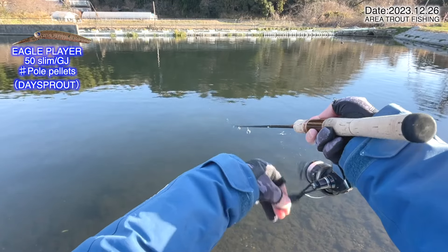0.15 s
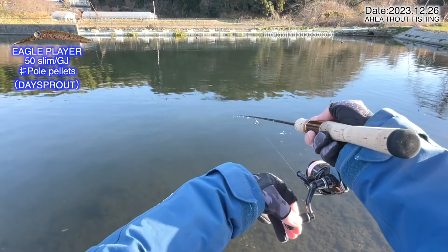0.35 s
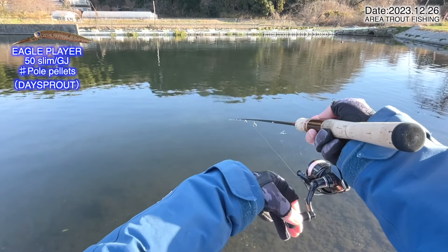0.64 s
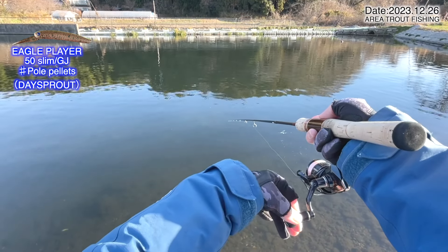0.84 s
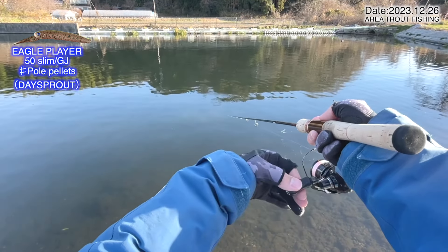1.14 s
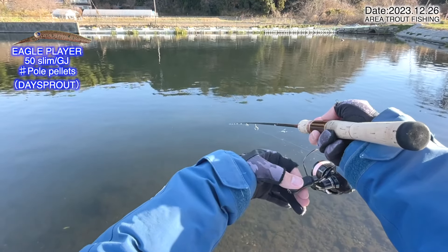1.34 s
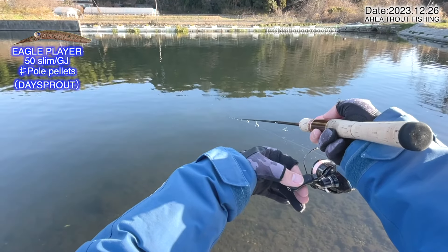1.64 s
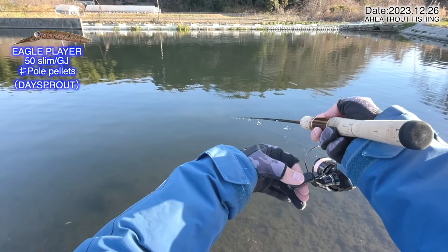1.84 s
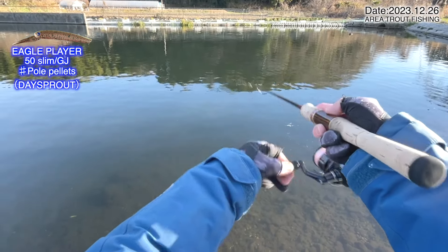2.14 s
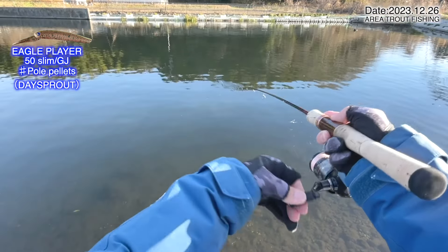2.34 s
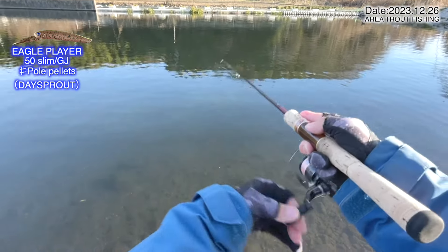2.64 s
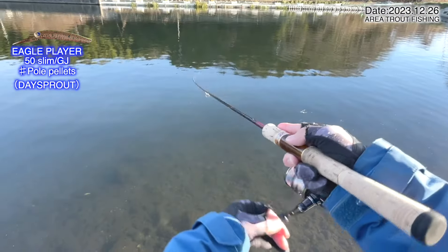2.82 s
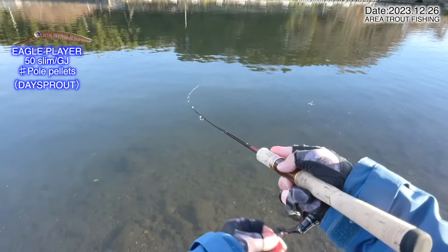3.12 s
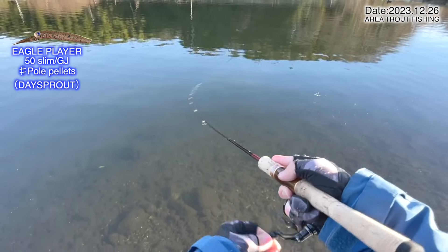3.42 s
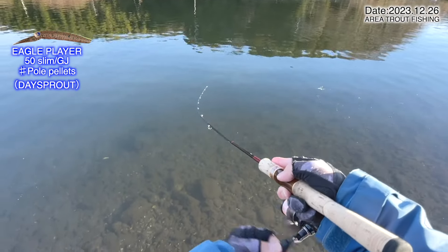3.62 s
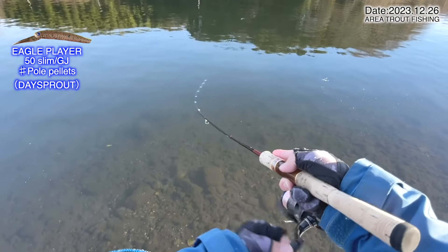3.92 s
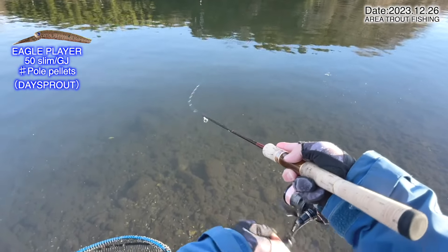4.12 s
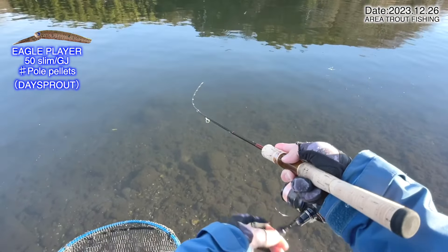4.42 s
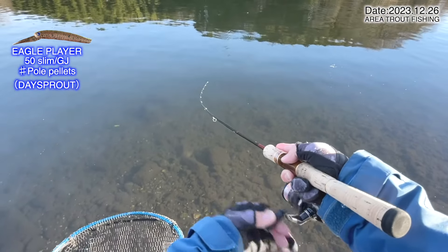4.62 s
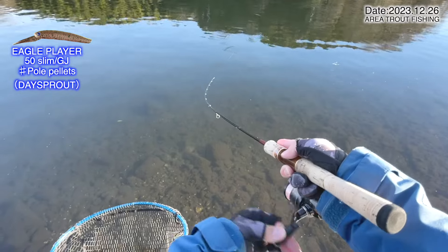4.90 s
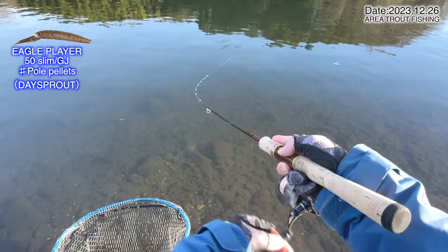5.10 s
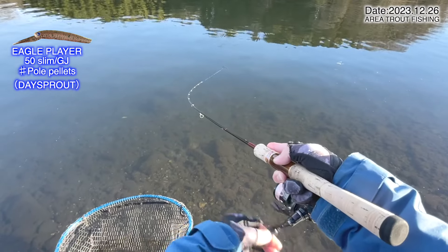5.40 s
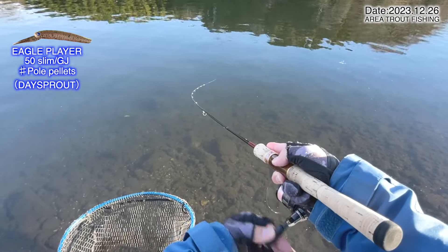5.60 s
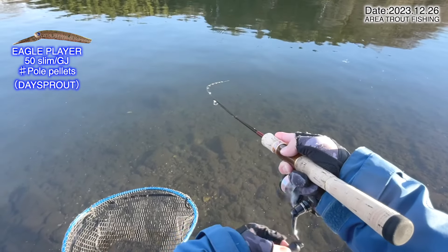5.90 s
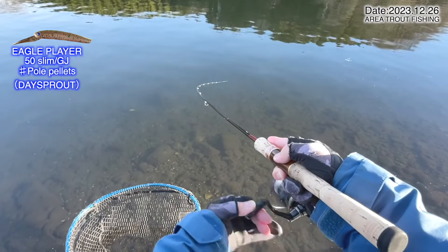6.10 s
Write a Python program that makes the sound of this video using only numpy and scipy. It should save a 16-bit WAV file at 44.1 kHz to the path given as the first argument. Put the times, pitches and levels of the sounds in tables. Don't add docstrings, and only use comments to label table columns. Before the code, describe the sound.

A spinning reel held near a two-channel microphone outdoors. Light clicks and cloth brushes come first over low air wash and a far pump hum. A rattle of ticks and a sharp bail clack lead into a rapid, crisp ratchet buzz that pulses several times a second. It thins to slow single clicks, then buzzes briefly again near the end, with a thin hiss of running line throughout the pull.

```python
import sys
import numpy as np
from scipy import signal
from scipy.fft import rfft, irfft, next_fast_len
from scipy.io import wavfile
from scipy.ndimage import uniform_filter1d, minimum_filter1d

SR = 44100
rng = np.random.default_rng(int(sys.argv[2]) if len(sys.argv) > 2 else 0)


def bounce(signal):
    frames = np.transpose(np.atleast_2d(signal))
    limited = np.clip(frames, -1, 1)
    pcm = np.round(limited * 32767).astype(np.int16)
    wavfile.write(sys.argv[1], SR, pcm)


def convert_level_to_amplitude(level_db):
    exponent = np.asarray(level_db, float) / 20
    return 10 ** exponent


N = 275659
TEETH = 24

# slack moment in seconds, speed then in teeth per second,
# moment of full pull in seconds, speed then in teeth per second.
FIGHT = [(2.4065, 150, 2.445, 370), (2.4876, 235, 2.56, 450), (2.6291, 180, 2.69, 330),
         (2.7555, 86, 2.835, 410), (2.8991, 180, 2.965, 320), (3.0275, 185, 3.08, 345),
         (3.1512, 105, 3.23, 390), (3.3017, 98, 3.365, 430), (3.4397, 67, 3.505, 320),
         (3.5782, 115, 3.63, 320), (3.7044, 117, 3.81, 410), (3.891, 115, 3.96, 265),
         (4.012, 145, 4.075, 340), (4.1355, 110, 4.19, 300), (4.2856, 100, 4.335, 320),
         (4.4041, 125, 4.48, 300), (4.5687, 112, 4.615, 215)]
BOLT = [
    (5.7017, 78, 5.756, 215),
]
RALLY = [
    (5.8291, 93, 5.857, 184),
    (5.892, 142, 5.945, 235),
]
LAST = [
    (6.1695, 120, 6.215, 238),
]
# time in seconds, speed in teeth per second.
STOPS = [
    (4.6464, 95),
    (5.8007, 110),
    (5.984, 120),
    (6.27, 210),
]
# frequency in Hz, likeness from -1 to 1.
AIR_SAME = [(60, 0.9), (200, 0.97), (350, 0.94), (700, 0.3), (1400, 0.55), (3800, -0.16), (4450, 0.3),
            (5300, -0.088), (6500, -0.073), (6950, -.98), (7950, -.98), (8400, 0.6)]


def evened(x):
    return x / np.sqrt(np.mean(x ** 2) + 1e-20)


def read(points, hz):
    f, value = np.transpose(points)
    return np.interp(np.log(hz + 1), np.log(f + 1), value)


def drifting(count, columns):
    alike = 3
    return np.sqrt(alike) * uniform_filter1d(rng.standard_normal((count, columns)), size=alike, axis=0)


def run_of_line(tugs, stop):
    tugs = np.array(tugs)
    s, speed = np.vstack([tugs.reshape(-1, 2), stop]).T
    t = np.arange(s[0], s[-1], 1 / SR)
    place = np.interp(t, s, np.arange(len(s)))
    eased = np.floor(place) + .5 - .5 * np.cos(np.pi * (place % 1))
    rate = np.interp(eased, np.arange(len(s)), speed)
    teeth = np.cumsum(rate) / SR
    slack = np.interp(s[::2], t, teeth)
    whole = np.cumsum(np.round(np.diff(slack, prepend=slack[0])))
    at = np.interp(np.arange(whole[-1] + 1), np.interp(teeth, slack, whole), t)
    return np.array([at, np.interp(at, t, rate)])


def cup_energy(s):
    # time in seconds, tick energy in dB.
    passes = [(2.232, -25.5), (2.423, -22), (2.509, -20.5), (2.566, -23), (2.646, -19.5), (2.719, -14.5),
              (2.826, -22), (2.921, -19.5), (2.994, -18.5), (3.088, -15.5), (3.199, -20), (3.268, -17.5),
              (3.361, -18), (3.484, -19), (3.582, -23), (3.661, -19), (3.783, -16.5), (3.847, -18),
              (3.97, -19), (4.067, -14.5), (4.167, -20.5), (4.259, -20), (4.363, -20), (4.486, -19),
              (4.616, -23), (4.943, -21.5), (5.327, -26), (5.742, -16), (5.921, -20), (6.09, -13)]
    # share of a turn, level of the cup in dB.
    around = [(0, -1), (.12, -10.5), (.28, -14.5), (.55, -11), (.8, -16), (.9, -3.5), (1, -1.5)]
    turn_s, turn_db = np.transpose(passes)
    marks = np.interp(turn_s, s, np.arange(len(s)))
    marks = np.concatenate([[marks[0] - TEETH], marks, [marks[-1] + TEETH, marks[-1] + 2 * TEETH]])
    angle = np.interp(np.arange(len(s)), marks, np.arange(len(marks)))
    return np.interp(s, turn_s, turn_db) + np.interp(angle % 1, *np.transpose(around))


def ring(s, energy_db, modes, tooth, spread_db, detune, rise_s):
    t, out = np.arange(560) / SR, np.zeros(N + 560)
    sound = np.zeros((len(s), len(t)))
    for hz, db, t60 in modes:
        chance = drifting(len(s), columns=3)
        of_tooth = rng.standard_normal(TEETH)[tooth]
        tuned = hz * (1 + detune * (of_tooth * .5 + 1.03 * chance[:, 0]))
        wave = np.sin(2 * np.pi * tuned[:, None] * t + 2 * chance[:, 1:2])
        sound += convert_level_to_amplitude(db + spread_db * chance[:, 2:]) * convert_level_to_amplitude(-60 * t / t60) * wave
    sound *= 1 - np.exp(-(t / rise_s) ** 2)
    sound *= (convert_level_to_amplitude(energy_db) / np.linalg.norm(sound, axis=1))[:, None]
    np.add.at(out, np.round(s * SR).astype(int)[:, None] + np.arange(len(t)), sound)
    return out[:N]


def drag():
    # frequency in Hz, level in dB, t60 in seconds.
    parts = [
        [(5000, -2, 0.007), (5350, 0, 0.009), (5700, -5, 0.006), (4650, -13, 0.005), (6250, -7, .005),
         (6800, -10, .005), (7200, -13, 0.005)],
        [(9200, 0, .008), (8350, -7, .008), (9750, -10, .006), (7600, -12, .004)],
        [(10700, -12, 0.008), (11480, -5, 0.01), (12500, 4, 0.009), (13200, 6, .008), (13750, 9, 0.007),
         (14400, 8, 0.007), (15100, 8, 0.007), (15600, 2, 0.006)],
        [(3044, -4, 0.04), (3505, -5, 0.1), (2000, 0.5, 0.008), (1500, 0.5, 0.0043), (2360, 6, 0.0051),
         (3960, 2, 0.006), (4300, 2, .006)],
    ]
    rise_s = [0.00039, 0.000046, 0.0003, 0.00044]
    detune = [.016, .013, .019, .005]
    # lower ring in dB, upper ring in dB.
    bite = [(-1.5, -7.5), (-8, -0.5), (-4, -2.5), (-4.5, -1), (-4, -1), (-3.5, -6), (-4, -0.5), (-3, -4),
            (-3.5, -4.5), (-6.5, -2.5), (-2, -2), (-5, -5), (-3, 0), (-2.5, -2.5), (-3, -3), (-3, -4.5),
            (-4, -3), (0, -5), (-3.5, -3), (-4, -2.5), (-3.5, -2)]
    # tick energy in dB at 200 teeth per second, dB more for ten times the speed.
    blow = [
        (-22, 1),
        (-21.5, 6),
        (-38, 5),
    ]
    uneven_db = [1.67, 2.47, 1.47, 0.92]
    # time in seconds, cup in dB, lower ring in dB, upper ring in dB.
    strike = [(2.1654, -38, -29.6, -31), (2.1842, -35, -30.2, -27), (2.1972, -40, -32, -27),
              (2.2065, -34, -34, -30.5), (2.2138, -38, -31, -28), (2.22, -24, -23, -22),
              (2.2251, -29, -30.0, -28), (2.23, -28, -28, -19), (2.2348, -29, -16, -20),
              (2.2398, -27, -24, -32), (2.245, -31, -31.6, -30.5), (2.2499, -33, -26, -32.3),
              (2.2556, -40, -29, -27), (2.2614, -37, -27, -27), (2.267, -41, -34, -23),
              (2.2726, -37, -29, -28), (2.2785, -35.9, -36, -28), (2.2834, -40, -31.6, -25),
              (2.2887, -32, -28, -14), (2.2944, -32, -28, -29), (2.3003, -33, -26, -24),
              (2.3069, -32, -28, -27), (2.3141, -35, -27, -32.8), (2.323, -39, -30, -30.1),
              (2.3351, -30, -26, -31), (2.3533, -35, -25.5, -25), (2.3743, -38, -30, -30.5),
              (2.3893, -35.4, -28.9, -26.7), (2.3992, -36, -33, -33.1)]
    tiring = [(4.6593, -29, -23, -20), (4.6717, -26.5, -35.5, -28.0), (4.685, -25, -26, -19),
              (4.7016, -27, -28, -18), (4.717, -27, -27, -17), (4.7346, -32, -38.0, -28),
              (4.7565, -38, -30, -26), (4.7746, -38, -26, -26), (4.7918, -31.5, -31, -25),
              (4.8095, -38, -26, -25), (4.8296, -40, -29, -27), (4.8482, -38, -25, -25.0),
              (4.8645, -39, -26, -27), (4.8772, -30, -23.0, -25), (4.8885, -32.0, -20, -30),
              (4.9001, -32.5, -29.5, -28), (4.9107, -28, -27, -32.5), (4.921, -24, -28, -31),
              (4.9317, -27, -29, -29), (4.9427, -20, -19, -30), (4.9548, -30.0, -21, -34),
              (4.9672, -26, -31.5, -32), (4.9769, -32, -22, -28.0), (4.9855, -31.0, -31, -24),
              (4.9946, -37, -39.5, -32.5), (5.0034, -26.5, -30, -30.5), (5.0135, -28, -24, -28.5),
              (5.0235, -27, -26, -28), (5.0331, -32.0, -24, -28.5), (5.0422, -31.5, -28.5, -22),
              (5.0523, -33, -26, -28), (5.0634, -34, -22, -26), (5.073, -36, -25, -18),
              (5.0836, -37.0, -24, -31), (5.094, -35, -30.5, -26.0), (5.1056, -36.0, -26, -20),
              (5.1196, -37, -30, -24.0), (5.1364, -35, -36, -23)]
    creep = [(5.1559, -37, -33, -26), (5.1758, -34, -29, -28), (5.2012, -30, -28, -30),
             (5.2318, -29, -30, -25), (5.266, -27, -31, -29.5), (5.296, -25.5, -28, -34),
             (5.3279, -24.5, -25, -27), (5.3588, -26.5, -24, -19), (5.3811, -26, -27, -26),
             (5.4047, -29, -24, -25), (5.4275, -28, -25, -20), (5.447, -26, -26, -32),
             (5.4676, -30, -22.5, -21.5), (5.4946, -32, -24.5, -24), (5.5297, -29.5, -30, -28),
             (5.558, -28, -28, -31), (5.582, -35, -31, -26), (5.611, -30, -24, -28),
             (5.6344, -36, -28, -23), (5.6526, -33, -28, -35), (5.6683, -34, -29, -26),
             (5.6844, -35, -23, -24)]
    pause = [(5.8168, -42, -39, -35), (5.9896, -31, -24, -22.0), (5.9988, -37, -34, -20),
             (6.0123, -33, -33.5, -28), (6.027, -34, -30, -23), (6.0404, -33, -32, -25.5),
             (6.0546, -32.0, -36.5, -28.0), (6.0674, -28, -32.5, -27), (6.078, -24.5, -26, -30),
             (6.0883, -19, -31.5, -28.5), (6.0986, -17.5, -27, -26), (6.1085, -26, -24, -23),
             (6.1185, -26, -23, -32.5), (6.129, -29, -23, -33.5), (6.139, -27, -24.5, -21),
             (6.15, -28, -22, -28), (6.161, -32, -30.0, -38)]
    body_share, single_body_db, uneven_slow_db = 0.1, -39, 2

    tugs = [FIGHT, BOLT, RALLY, LAST]
    run_s, rate = np.concatenate([run_of_line(*run) for run in zip(tugs, STOPS)], axis=1)
    pull_s = np.concatenate(tugs)[:, 2]
    lower_db, upper_db = (np.interp(run_s, pull_s, db) for db in np.transpose(bite))
    single_s, *single_db = np.concatenate([strike, tiring, creep, pause]).T
    s = np.concatenate([run_s, single_s])
    order = np.argsort(np.argsort(s))
    cup_db = cup_energy(np.sort(s))[order][:len(run_s)]

    run_db = [cup_db]
    for (db, more_db), bite_db in zip(blow, [lower_db, upper_db, upper_db]):
        run_db.append(db + bite_db + more_db * np.log10(rate / 200))
    run_db = np.array(run_db)
    run_db[3] += body_share * (cup_db + 29.0)
    chance = rng.standard_normal((len(run_s), 5)).T
    run_db += np.reshape(uneven_db, (4, 1)) * drifting(len(run_s), columns=4).T
    run_db += uneven_slow_db * np.clip(1.5 - rate / 100, 0, 1) * chance[1:]

    late_s = np.append(.00008 * chance[0], 0 * single_s)
    s = np.clip(s + late_s, 0, N / SR)
    single_db = single_db + [0 * single_s + single_body_db]
    energy_db = np.concatenate([run_db, single_db], axis=1)
    energy_db[:, s >= N / SR] = -200
    return sum(ring(s, e, modes, order % TEETH, 5.9, share, rise)
               for e, modes, share, rise in zip(energy_db, parts, detune, rise_s))


def knocks(table, t60):
    out, t = np.zeros(N), np.arange(300) / SR
    for s, db, hz, width_hz in table:
        puff = (rng.standard_normal(len(t)) + 3 * (t == 0)) * convert_level_to_amplitude(-60 * t / t60)
        b, a = signal.iirpeak(hz, hz / width_hz, SR)
        snap = signal.lfilter(b, a, signal.lfilter(b, a, puff))
        out[round(s * SR):][:len(t)] += convert_level_to_amplitude(db) * snap / abs(snap).max()
    return out


def handling():
    # time in seconds, peak in dB, centre in Hz, width in Hz.
    handle_bail = [(0.091, -49.5, 4500, 4000), (0.0912, -57, 12800, 3000), (0.211, -49, 3870, 1200),
                   (0.2106, -53, 1800, 1500), (1.034, -51.5, 1800, 1500), (0.2112, -43, 7200, 6000),
                   (1.0343, -46.5, 3700, 1500), (1.0345, -42.5, 7510, 6000), (1.103, -55, 8000, 8000),
                   (1.109, -61, 8050, 7980), (1.198, -45.5, 706, 600), (2.1056, -43, 6000, 5040),
                   (0.2108, -48, 13000, 3000), (0.9, -69, 12500, 3000), (2.625, -46.5, 900.3, 911),
                   (4.24, -45.5, 811, 900)]
    hard_drops = [
        (2.4998, -25, 11500, 9000),
        (2.5040, -30, 12500, 5000),
        (3.4598, -32, 6000, 7000),
        (5.7418, -30, 5300, 1800),
        (3.5782, -30, 5400, 1400),
        (3.5864, -31, 5400, 1400),
    ]
    return knocks(handle_bail + hard_drops, t60=0.0067)


def bail_clack():
    # time in seconds, peak in dB, centre in Hz, width in Hz.
    slap = [
        (2.4031, -28, 2500, 2600),
        (2.4040, -43, 1320, 920),
        (2.4035, -30, 3900, 3000),
    ]
    clack = knocks(slap, t60=0.0035)
    return np.array([clack, np.roll(clack, 3)])


def ports(x):
    # frequency in Hz, lead in radians.
    lead = [(0, 0), (2000, .3), (2700, 3.1), (3600, 1.5), (5700, .9), (6700, 2.8), (7600, 3.2), (9300, 4.4),
            (10400, 6.2), (11600, 6.4), (13900, 9.3), (14600, 9.5), (15400, 10.2), (16000, 10.6)]
    # frequency in Hz, left over right in dB.
    balance = [(1300, 1.5), (2400, 2.5), (4400, -2), (6500, -2), (8000, 0), (9500, -1), (15000, 0)]
    size = next_fast_len(N)
    hz = np.fft.rfftfreq(size, 1 / SR)
    half = convert_level_to_amplitude(read(balance, hz) / 2) * np.exp(.5j * np.interp(hz, *np.transpose(lead)))
    return irfft(rfft(x, size) * np.array([half, 1 / half]), size)[:, :N]


def near_echo(x):
    count = 900
    fade = convert_level_to_amplitude(-60 * np.arange(count) / SR / .012)
    echo = uniform_filter1d(rng.standard_normal((2, count)), size=2) * fade
    wet = signal.fftconvolve(x[None], echo / np.linalg.norm(echo[0]), axes=1)[:, :N]
    return convert_level_to_amplitude(-10) * wet


def groan():
    # start in seconds, length in seconds, pitch in Hz, peak in dB.
    s, length, hz, db = (3.29, .11, 388, -51)
    u = np.clip((np.arange(N) / SR - s) / length, 0, 1)
    turn = 2 * np.pi * np.cumsum(hz * (1 - 0.053 * u ** 2)) / SR
    return convert_level_to_amplitude(db) * np.sin(np.pi * u) ** 2 * np.sin(turn)


def noise(colour, patchy_db, likeness):
    # frequency in Hz, left over right in dB.
    balance = [(60, -1), (200, -3), (380, -3.5), (700, .5), (1300, 0), (2400, 4), (4400, -1), (8000, 0)]
    hz = np.fft.rfftfreq(1024, 1 / SR)
    a, b, c, d, patches = rng.standard_normal((N // 256 + 5, 513, 5)).T
    patches = uniform_filter1d(uniform_filter1d(patches, size=10, axis=0), size=10, axis=1)
    patches = evened(patches)
    same = np.clip(read(likeness, hz), -1, 1)[:, None]
    left = a + 1j * b
    right = same * left + np.sqrt(1 - same ** 2) * (c + 1j * d)
    z = np.array([left, right])
    z *= convert_level_to_amplitude(read(colour, hz)[:, None] + patchy_db * patches)
    z *= convert_level_to_amplitude(np.outer([.5, -.5], read(balance, hz)))[..., None]
    return evened(signal.istft(z, nperseg=1024, noverlap=768)[1][:, :N])


def rustle():
    # frequency in Hz, level in dB per Hz.
    cloth = [(600, 0), (1500, -2.5), (4100, -1), (4500, 3), (4850, -4), (6000, 0), (7500, 5),
             (10000, -12.5), (13000, -3.5), (14200, -44), (15400, -9), (16200, -56)]
    # time in seconds, peak in dB, rise and fall in dB per second.
    sleeves = [
        (0.201, -71.5, 98, 150),
        (.32, -74, 90, 200),
        (1.0, -62.5, 180, 115),
    ]
    crank_db, crank_end_s = -92, 1.5
    hiss_s, hiss_db, hiss_rise = 2.148, -59.5, 165
    hiss_speed_db = 1.5

    t = np.arange(N) / SR
    level = convert_level_to_amplitude(crank_db - 60 * np.maximum(t - crank_end_s, 0))
    for s, db, rise, fall in sleeves:
        level += convert_level_to_amplitude(db - np.where(t < s, rise * (s - t), fall * (t - s)))
    strike = [(0, 0, 2.235, 200), (0, 0, 2.36, 50)]
    creep = [(0, 0, 4.8, 60), (0, 0, 5.6, 40)]
    pulls = np.array(strike + FIGHT + creep + BOLT + RALLY + LAST)
    speed_db = hiss_speed_db * np.log10(np.interp(t, pulls[:, 2], pulls[:, 3]) / 200)
    level += convert_level_to_amplitude(hiss_db + speed_db - hiss_rise * np.maximum(hiss_s - t, 0))
    return level * noise(cloth, 4.2, AIR_SAME)


def motor():
    # time in seconds, shaft speed in Hz, how well the air carries it in dB.
    shaft = [(0.0, 55.95, -4.5), (0.78, 54.52, 1.5), (0.88, 55.66, -4.5), (1.06, 55.55, -2.5),
             (1.46, 51.39, 7.5), (1.88, 50.8, -7.5), (2.3, 49.57, -2), (2.49, 50.3, -12), (2.92, 50.66, 3),
             (3.17, 50.35, -4), (3.3, 50.7, 0.5), (4.11, 50.1, 1.5), (5.05, 50.4, -1.5), (5.13, 51.06, -1),
             (5.28, 51.25, -0.5), (5.92, 51.8, 0.5), (6.25, 52.8, 1)]
    # level in dB at 52 Hz, dB per Hz of speed, share of the carry.
    order_law = [
        (-55, 1.94, 0.62),
        (-51, -0.71, 0.35),
    ]
    s, *columns = np.transpose(shaft)
    hz, carry_db = (np.interp(np.arange(N) / SR, s, c) for c in columns)
    first_db, second_db = (db + slope * (hz - 52) + share * carry_db for db, slope, share in order_law)
    flutter = uniform_filter1d(uniform_filter1d(rng.standard_normal((2, N)), size=1200), size=1200)
    flutter = evened(flutter)
    turn = 2 * np.pi * np.cumsum(hz) / SR
    first = convert_level_to_amplitude(first_db + 2.0 * flutter[0]) * np.sin(turn)
    second = convert_level_to_amplitude(second_db + 0.95 * flutter[1]) * np.sin(2 * turn)
    return np.sqrt(2) * (first * convert_level_to_amplitude([[.1], [-.1]]) + second * convert_level_to_amplitude([[-.9], [.9]]))


def open_air():
    # frequency in Hz, level in dB per Hz.
    colour = [(20, -31), (40, -34), (65, 0), (130, -8), (270, -10), (630, -16), (900, -21.5), (1080, -27.5),
              (2370, -33), (4130, -34.5), (4500, -48), (4850, -37), (5430, -32), (7400, -50), (8500, -49),
              (11000, -50.5), (13000, -64), (13600, -87)]
    # time in seconds, level in dB.
    swell = [(0, 2), (1.2, 2), (2, 1.5), (3, 2), (4, 4), (5, 2.5), (6.25, 3.5)]
    swell_db = np.interp(np.arange(N) / SR, *np.transpose(swell))
    return convert_level_to_amplitude(-56 + swell_db) * noise(colour, 1.22, AIR_SAME)


def scene():
    reel = drag() + handling()
    near = ports(reel) + bail_clack() + near_echo(reel) + groan()
    return near + rustle() + motor() + open_air()


def gated(x):
    # frequency in Hz, dB under the nearby peak.
    gate_under = [(6300, 60), (6900, 15), (8000, 20), (12500, 21), (13500, 14)]
    # from Hz, to Hz, above this many teeth per second.
    hollow = [
        (2500, 2850, 310),
        (6900, 8150, 255),
        (13750, 15000, 255),
    ]
    chance_db, cut_db = 5, 40
    hz, t, z = signal.stft(x, SR, nperseg=256)
    level_db = 10 * np.log10((abs(z[:, hz > 6800]) ** 2).mean((0, 1)) + 1e-16)
    under_db = -minimum_filter1d(-level_db, size=17) - level_db
    chance = evened(uniform_filter1d(rng.standard_normal((17, z.shape[2])), size=3))
    chance = chance[np.arange(len(hz)) // 8]
    shut = under_db + chance_db * chance > read(gate_under, hz)[:, None]
    shut &= under_db > 10
    speed = np.interp(t, *np.vstack([np.reshape(FIGHT, (-1, 2)), STOPS[0]]).T, left=0)
    for low_hz, high_hz, rate in hollow:
        z = z - z.mean(0) * np.outer((hz > low_hz) & (hz < high_hz), speed > rate)
    return signal.istft(z * convert_level_to_amplitude(-cut_db * shut), SR, nperseg=256)[1][:, :N]


def roll_off(x):
    return signal.sosfilt(signal.butter(12, 15800, fs=SR, output="sos"), x)


def record(dry):
    mix = gated(dry)
    return roll_off(mix)


dry = scene()
out = record(dry)
bounce(out)
```